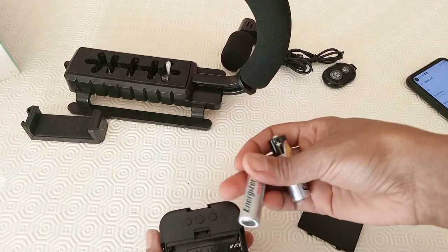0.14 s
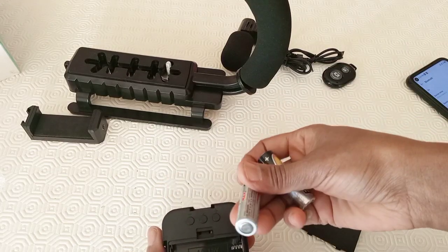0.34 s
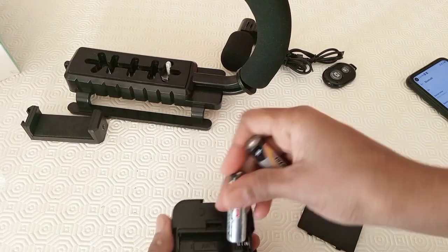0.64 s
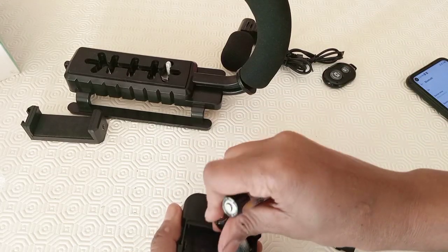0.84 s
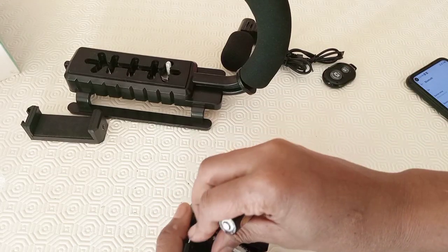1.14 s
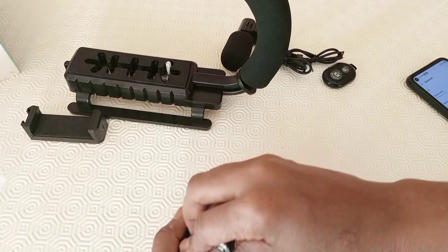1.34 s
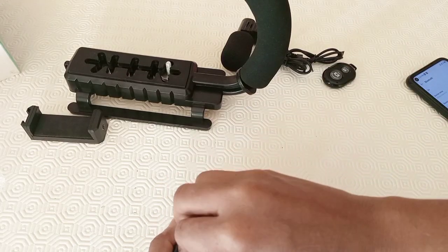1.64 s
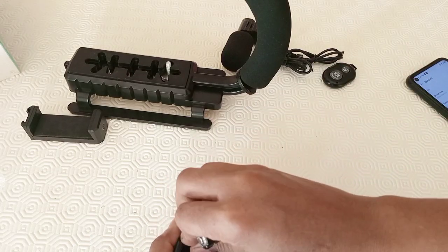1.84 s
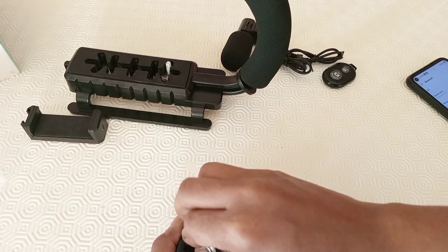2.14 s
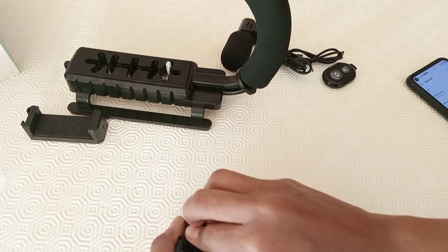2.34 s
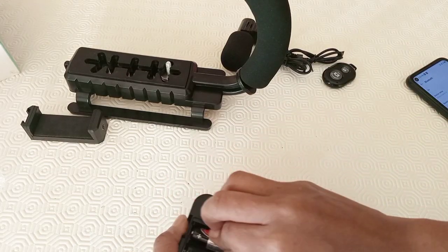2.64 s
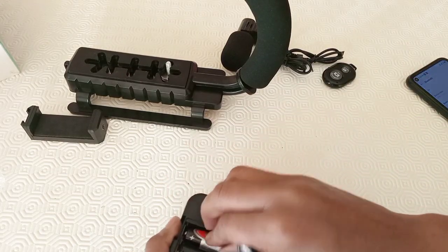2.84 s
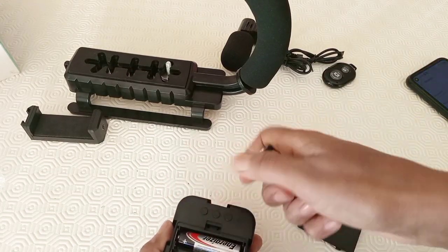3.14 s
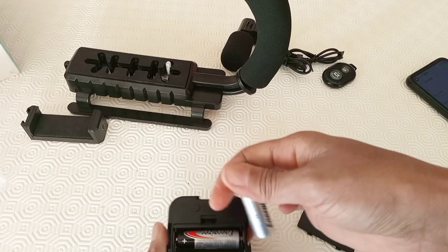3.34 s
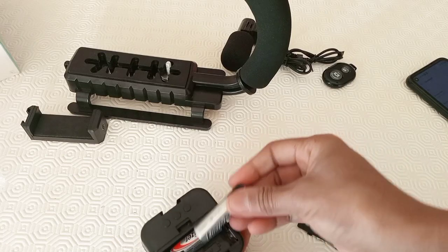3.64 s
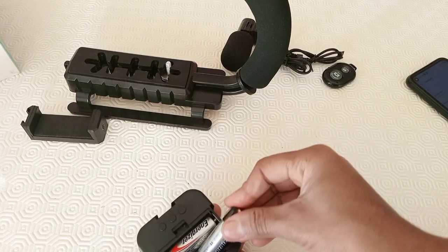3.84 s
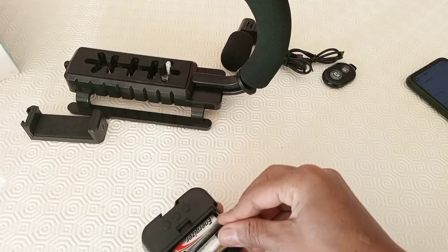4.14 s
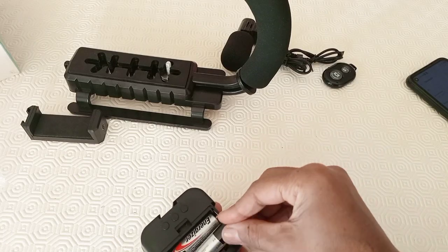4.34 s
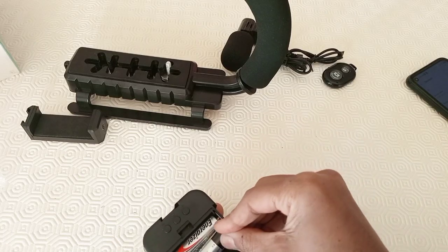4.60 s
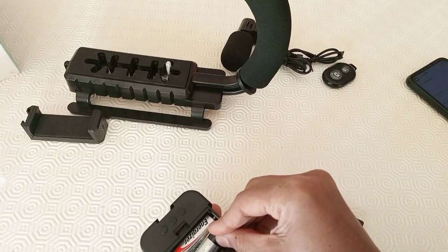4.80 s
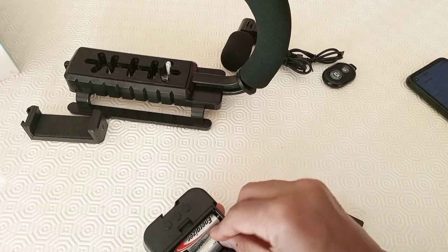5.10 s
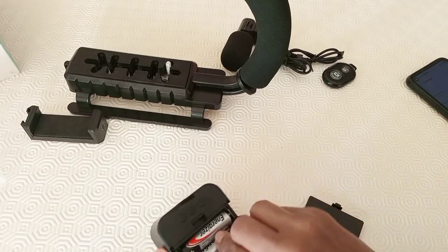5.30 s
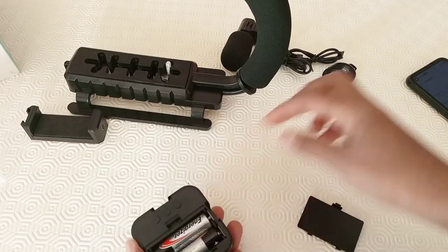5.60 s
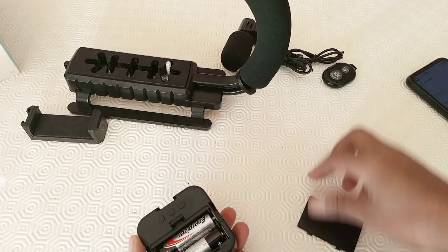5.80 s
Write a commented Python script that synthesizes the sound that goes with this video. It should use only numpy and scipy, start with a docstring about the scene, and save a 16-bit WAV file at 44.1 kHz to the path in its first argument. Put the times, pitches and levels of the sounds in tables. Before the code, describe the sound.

Plastic and metal handling sounds at a table: barely audible touches with tiny spring ring, a sharp clack and a harder snap in the middle, each followed by a short room tail. Then a medium click, a rapid grating run of little clicks, and a few light taps. Beneath lie weak rumble, a slowly throbbing low motor hum and dull muffled swells. Close phone-like pickup with dull extreme treble.

```python
"""A quiet room: small cells are pushed into a plastic battery box held over a table, close to a phone.
Each contact rings the box modes for a few ms, with chatter, knock and crack, and the room answers.
Fingers rub on plastic as stick-slip grit; contact springs sing faintly as narrow, fading noise bands.
Two motors at nearly the same speed beat in a low hum over flickering rumble, drones, swell and whine."""
import sys
import numpy as np
from scipy import signal
from scipy.fft import rfft, irfft
from scipy.io import wavfile
from scipy.ndimage import uniform_filter1d

SR = 44100
rng = np.random.default_rng(int(sys.argv[2]) if len(sys.argv) > 2 else 0)


def unload_wav(signal):
    """Save mono or channel-first audio to the path in sys.argv[1] as 16-bit WAV at rate SR, clipped to [-1, 1]."""
    wavfile.write(
        sys.argv[1],
        SR,
        np.round(np.clip(np.atleast_2d(signal).T, -1, 1) * 32767).astype(np.int16),
    )


N = 262836
T = np.arange(N) / SR

# resonances of the box around cell, bay and edge:
# pitch_ratio [to the family's pitch], level_db [relative], t60_s [s]
CELL_MODES = [(.9, -14, .01), (0.998, 5.5, 0.012), (1.13, -13.5, .012), (1.28, -10, .012)]
BAY_MODES = [(.85, -15, .007), (0.998, 4.5, 0.0067), (1.12, -8.5, .007)]
EDGE_MODES = [(.88, -8, .004), (0.961, 1, .005), (1, 0, .007), (1.08, -2, .005), (1.25, -11.5, .005),
              (1.29, -3, .006), (1.449, -4.5, .004)]
EDGE_HZ = 6620


def undb(db):
    """dB to gain."""
    return 10 ** (np.asarray(db) / 20)


def unit(x):
    """Scale to rms 1."""
    return x / np.sqrt(np.mean(x ** 2))


def band(x, lo_hz, hi_hz, order=2):
    """Butterworth band-pass."""
    return signal.sosfilt(signal.butter(order, [lo_hz, min(hi_hz, .49 * SR)], "band", fs=SR, output="sos"), x)


def narrow(hz, width_hz, order=1):
    """Noise in one resonance, rms 1: a wavering tone when the width is small."""
    return unit(band(rng.standard_normal(N), hz - width_hz / 2, hz + width_hz / 2, order))


def walk(rate):
    """Random drift: levels held 1 / rate s and smoothed twice."""
    hold = int(SR / rate)
    steps = np.repeat(rng.standard_normal(N // hold + 1), hold)
    return 1.1 * uniform_filter1d(uniform_filter1d(steps, hold), hold)[:N]


def add(out, start_s, x):
    """Mix x into out from start_s."""
    i = int(start_s * SR)
    out[i:i + len(x)] += x[:N - i]


def hum():
    """Two motors: close tones of nearly equal strength cancel almost fully once a beat."""
    centre_hz, level_db, second_share = 102.69, -54, 0.96
    beat_s, null_s = .697, 0.52  # beat period, time of one null
    turn = 2 * np.pi * centre_hz * T
    beat = np.pi * (T - null_s) / beat_s
    pair = np.sin(turn + beat) - second_share * np.sin(turn - beat)
    return undb(level_db + 0.42 * walk(14)) * pair


def air():
    """Rumble and hiss of the room, the level of each band made to flicker separately;
    wavering drones, a dull swell and a whine that come and go."""
    # steady noise spectrum: pitch_hz [Hz], density_db [dB per Hz]
    spectrum = [(20, -115), (50, -90.5), (64, -94.5), (82, -79), (130, -79), (200, -81), (290, -91.5),
                (430, -92), (630, -99), (1000, -113), (2000, -119), (4000, -123), (6500, -124),
                (8200, -131), (12000, -135), (14000, -128), (16600, -121)]
    # wavering tones: pitch_hz [Hz], width_hz [Hz], level_db [dB rms]
    drone_tones = [(75.6, 8.6, -64.5), (156.3, 4.7, -64.5), (357.9, 10, -71.5), (5370, 30, -94)]
    # level line of the dull swell: time_s [s], level_db [dB rms]
    swell_levels = [(0, -84), (1.03, -76), (1.21, -64.5), (1.49, -53), (1.63, -60.5), (1.92, -88.5),
                    (2.06, -54), (2.24, -55), (2.37, -68.5), (2.75, -57.5), (2.97, -60.5), (3.1, -78),
                    (3.5, -80.5), (4.23, -64), (4.53, -77.5), (5.1, -77.5), (5.43, -68.5), (5.6, -78),
                    (5.96, -92)]
    # resonances of the swell: pitch_hz [Hz], width_hz [Hz], level_db [relative]
    swell_modes = [(445, 60, -2.5), (650, 120, 3), (894, 160, -6), (1110, 330, -19)]
    whine_hz, whine_db, whine_floor_db = 285.6, -5, -76  # level under the swell; constant floor

    hz, db = np.transpose(spectrum)
    f = np.fft.rfftfreq(N, 1 / SR)
    density = np.interp(np.log(f + 1), np.log(hz), db)
    colour = rfft(rng.standard_normal(N)) * undb(density) * np.sqrt(SR / 2)
    band_number = np.round(3 * np.log2(np.minimum(f, 8000) / 200 + 1))
    flickering = 0
    for k in np.unique(band_number):
        flicker = undb(1.5 * walk(4.8) + 1.1 * walk(20))
        flickering = flickering + irfft(colour * (band_number == k), N) * flicker

    drones = sum(undb(db) * narrow(hz, width) for hz, width, db in drone_tones)
    swell_gain = undb(np.interp(T, *np.transpose(swell_levels)))
    swell = unit(sum(undb(db) * narrow(hz, width, order=2) for hz, width, db in swell_modes))
    whine = narrow(whine_hz, 25.0) * (undb(whine_db) * swell_gain + undb(whine_floor_db))
    return flickering + drones + swell * swell_gain + whine


def rub(cell_hz=2550, bay_hz=4500):
    """Fingers and cells slide: dense stick-slip grit through the box resonances, skin hiss on top."""
    # slides on plastic: start_s [s], length_s [s], box_db [dB], skin_db [dB]
    slides = [(0.618, .063, -77, -83), (.815, 0.072, -76, -88), (1.05, 0.069, -76, -76.5),
              (1.25, 0.09, -89, -94), (1.328, 0.12, -69.5, -83), (1.433, 0.055, -90, -76),
              (1.73, 0.081, -79, -91), (2.093, 0.088, -71.5, -91), (3.239, .17, -91, -75.5),
              (3.48, .1, -90.5, -79.5), (4.046, 0.036, -60, -77), (4.094, .094, -57.5, -73),
              (5.301, 0.06, -70, -80), (5.391, .04, -63.5, -78), (5.422, 0.026, -59, -62),
              (4.27, .11, -87, -86), (5.55, 0.17, -87, -83.5), (5.903, .104, -71, -78.5)]
    skin_lo_hz, skin_hi_hz = 6700, 16700
    grit = rng.standard_normal(N) * undb(5.5 * walk(150))
    box = 0
    for pitch_hz, family in ((cell_hz, CELL_MODES), (bay_hz, BAY_MODES), (EDGE_HZ, EDGE_MODES)):
        for ratio, db, _ in family:
            hz = pitch_hz * ratio
            box = box + undb(db) * band(grit, hz * .93, hz * 0.97, order=1)  # just under the mode
    box = unit(box)

    out = np.zeros(N)
    for start_s, length_s, box_db, skin_db in slides:
        part = slice(int(start_s * SR), int((start_s + length_s) * SR))
        skin = unit(band(grit[part], skin_lo_hz, skin_hi_hz))
        stroke = np.hanning(len(skin)) ** .5
        out[part] += stroke * (undb(box_db) * box[part] + undb(skin_db) * skin)
    return out


def ring(modes, hz, force, luck):
    """Modes swell while the contact lasts, then die away, a little different at each blow; peak 1."""
    t = np.arange(int(SR / 25)) / SR
    y = 0
    for (ratio, db, t60), (level_luck, pitch_luck, phase_luck) in zip(modes, luck):
        shape = np.convolve(1000 ** (-t / max(t60, 1e-3)), force)[:len(t)]
        turn = 2 * np.pi * hz * ratio * (1 + pitch_luck / 100) * t + 2 * phase_luck
        y = y + undb(db + 2 * level_luck) * shape / shape.max() * np.sin(turn)
    return y / np.abs(y).max()


def clicks():
    """A contact rings the box modes; its micro-bounces add a broad chatter, a dull knock and a bright crack.
    The room hears the chatter from all sides, so with an even colour. Returns direct sound and room feed."""
    # contacts: start_s [s]; shell_db, cell_db, bay_db, edge_db [peak dB of each mode family];
    # crack_db [peak dB]; cell_hz [Hz, as the grip sets it]; chatter_db [dB against the modes]
    contacts = [(0.801, -58, -52.5, -76, -61, -54, 2500, -10), (0.852, -64, -48.5, -60, -49, -50, 3000, -8),
                (1.068, -61, -49.5, -76.5, -61, -78, 2510, -8),
                (1.151, -71, -61, -69, -72, -59.5, 3130, -9), (1.248, -65, -60.5, -80, -74, -85, 2510, -3),
                (1.349, -67, -43, -56.5, -54, -48, 2580, -12), (1.405, -50, -40, -58, -56, -70, 2500, -14),
                (1.453, -49, -41.5, -56, -43, -39, 2370, -15), (1.62, -61, -72, -71, -64, -54.5, 2500, -6),
                (2.105, -52, -49.5, -75.5, -53, -74, 2990, -10),
                (2.133, -44.5, -45, -79, -75, -82, 2450, -3.5),
                (2.389, -24, -19, -25.5, -22, -24, 2505, 1.5),
                (2.632, -18, -12, -9, -17.5, -15, 2653, -14.5),
                (3.719, -25, -24.5, -28, -30.5, -36.5, 2480, -2),
                (3.92, -36.5, -28, -33.5, -41, -53, 2660, -3.5),
                (4.05, -48, -35, -47, -47.5, -68, 2850, -5),
                (4.07, -49.5, -37.5, -43.5, -55, -60, 2740, -4),
                (4.077, -41.5, -30.5, -49, -50, -70, 2595, -6),
                (4.088, -49, -42, -46.5, -55, -59, 2710, -9), (4.102, -39.5, -24, -41, -39, -49, 2610, -6),
                (4.109, -33, -22.5, -37, -34.5, -41, 2510, -3.5),
                (4.124, -24, -23, -34.5, -41.5, -43, 2430, -3.5),
                (4.148, -40.5, -39, -45, -44, -42, 2330, -5),
                (4.181, -36, -40.5, -43.5, -49, -62, 2420, -5),
                (4.367, -48, -63, -73, -74.5, -85, 2594, -4.5),
                (4.468, -43, -47, -57.5, -68.5, -80, 2400, -7.5),
                (4.657, -71, -43.5, -44.5, -42, -38, 2504, -5.5),
                (5.288, -42, -39, -41.5, -52.5, -56, 2965, -1.5),
                (5.293, -41, -36, -57, -36.5, -42, 2409, -2.5),
                (5.403, -63, -49.5, -46.5, -67, -70, 2500, -3.5),
                (5.422, -56, -53.5, -58, -59, -58, 2500, 3),
                (5.9, -88, -55.5, -61.5, -72.5, -73.5, 2950, -4.5),
                (5.926, -74, -60, -54, -53.5, -67, 2870, -1)]
    # shell resonances: pitch_ratio [to the shell's pitch], level_db [relative], t60_s [s]
    shell_modes = [(.78, -10.5, .012), (1, 4, 0.015), (1.25, -12.5, .012), (1.75, -12, 0.026)]
    light_db, hard_db = -35, -30  # shell levels of a light touch and of a hard snap
    shell_span_hz, bay_span_hz = (707, 963), (4190, 4630)  # light, hard: the snap sounds higher
    contact_ms, rise_ms = 1.15, .3  # time constants of the contact force
    knock_db = -17  # against the shell
    room_modes_db, room_chatter_db = -4, 2.5

    near, far = np.zeros((2, N))
    ms = np.arange(int(SR / 60)) / SR * 1000
    force = (1 - np.exp(-ms / rise_ms)) * np.exp(-ms / contact_ms)
    for start_s, shell_db, cell_db, bay_db, edge_db, crack_db, cell_hz, chatter_db in contacts:
        chatter_grit, crack_grit = rng.standard_normal((2, len(ms)))
        luck = rng.standard_normal((4, 8, 3))
        shell_hz = np.interp(shell_db, (light_db, hard_db), shell_span_hz)
        bay_hz = np.interp(shell_db, (light_db, hard_db), bay_span_hz)
        families = [(shell_modes, shell_hz, shell_db), (CELL_MODES, cell_hz, cell_db),
                    (BAY_MODES, bay_hz, bay_db), (EDGE_MODES, EDGE_HZ, edge_db)]
        for (modes, hz, db), chance in zip(families, luck):
            tones = undb(db) * ring(modes, hz, force ** 2, chance)
            add(near, start_s, tones)
            add(far, start_s, undb(room_modes_db) * tones)

        noises = [(hz * 0.59, hz * 1.294, db + chatter_db, chatter_grit) for _, hz, db in families]
        noises.append((8960, 18000, crack_db, crack_grit))
        noises.append((1160, 2230, shell_db + knock_db, crack_grit))
        signs = 1, 1, -1, 1, -1, -1  # neighbouring bands add up where they meet
        for (lo_hz, hi_hz, db, noise), sign in zip(noises, signs):
            burst = band(noise * force ** 0.43, lo_hz, hi_hz)
            burst *= sign * undb(db) / np.abs(burst).max()
            add(near, start_s, burst)
            even = sign * unit(band(ms == 0, lo_hz, hi_hz))  # filtered single impulse
            add(far, start_s, undb(room_chatter_db) * np.std(burst) * even)
    return near, far


def springs():
    """Coils rattle on in narrow, fading bands; a touch favours the modes near its own pitch."""
    # touches: start_s [s], level_db [dB], touch_hz [Hz, centre of excitation], spread [octaves]
    touches = [(0.804, -60.5, 2600, 0.17), (.856, -55.5, 1570, .1), (.856, -53, 2940, 0.11),
               (1.108, -58, 3120, 0.079), (1.153, -72.5, 4630, 0.38), (1.204, -69, 3000, .1),
               (1.351, -58, 2500, 0.11), (1.454, -54, 4000, 0.058), (1.455, -69, 2430, 0.092),
               (1.622, -60, 3000, 0.4), (1.75, -66, 2730, 0.14)]
    # contact spring modes: pitch_hz [Hz], level_db [relative], t60_s [s]
    coil_modes = [(1570, -5.5, 0.14), (2449, -0.5, 0.28), (3010, -3, 0.12), (4000, -4, 0.19),
                  (4400, 1, 0.11), (5800, 1, 0.099)]
    out, t = np.zeros(N), T[:SR // 3]
    for hz, mode_db, t60 in coil_modes:
        rattle = narrow(hz, 21.0)
        fade = 1000 ** (-t / t60)
        for start_s, db, touch_hz, spread in touches:
            share = np.exp(-.5 * (np.log2(hz / touch_hz) / spread) ** 2)
            part = rattle[int(start_s * SR):][:len(t)]
            add(out, start_s, share * undb(db + mode_db) * part * fade)
    return out


def room(near, far):
    """The table top answers first, then a diffuse tail with its own fade in each band, fastest at the top.
    The tail's fine grain is redrawn every redraw_s, so no fixed comb colours all clicks."""
    # tail bands: centre_hz [Hz], t60_s [s], level_db [relative]
    tail_bands = [(666, 0.4, -24.5), (1298, 0.54, -23), (2890, .5, -23), (4400, 0.59, -24),
                  (8000, .4, -19.5), (16000, .22, -15)]
    gap_s, redraw_s = 0.0055, .05  # build-up of the tail; life of one grain
    table_s, table_db = .0035, -13
    t, step = T[:int(.8 * SR)], int(redraw_s * SR)
    out = undb(table_db) * np.roll(near, int(table_s * SR))
    grains = np.array([unit(band(rng.standard_normal(N + len(t)), hz / 2 ** .5, hz * 2 ** .5))
                       for hz, _, _ in tail_bands])
    fades = np.array([undb(db) * 1000 ** (-t / t60) for _, t60, db in tail_bands])
    fades = fades * np.clip(t / gap_s, 0, 1) ** 2 / np.sqrt(SR / 100)
    for i in range(0, N, step):
        tail = np.sum(grains[:, i:i + len(t)] * fades, axis=0)
        add(out, (i + .5) / SR, signal.fftconvolve(far[i:i + step], tail))  # .5 guards the rounding
    return out


def scene():
    """Handling sounds with their room, over hum and air."""
    near, far = clicks()
    sliding = springs() + rub()
    handling = near + sliding
    return (handling + room(handling, far + sliding) + hum() + air())[None]


def record(dry):
    """A peak near 15 kHz and a dip near 12.8 kHz; a sharp step down above 15.5 kHz, a steep cut at 16.6 kHz."""
    peak_hz, peak_db, dip_hz, dip_db = 15160, 11.5, 12800, -8
    step_hz, step_db, top_hz = 15480, -23, 16645
    mic = dry + (undb(peak_db) - 1) * band(dry, peak_hz * 0.987, peak_hz * 0.99, order=1)
    mic = mic + (undb(dip_db) - 1) * band(mic, dip_hz * .93, dip_hz * 1.07, order=1)
    low = signal.sosfiltfilt(signal.ellip(8, .1, 30, step_hz, fs=SR, output="sos"), mic)
    mic = low + undb(step_db) * (mic - low)
    return signal.sosfilt(signal.ellip(10, .2, 80, top_hz, fs=SR, output="sos"), mic)


dry = scene()
out = record(dry)
unload_wav(out)
```